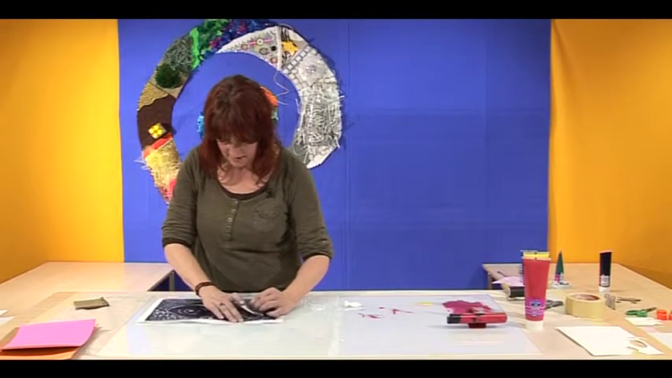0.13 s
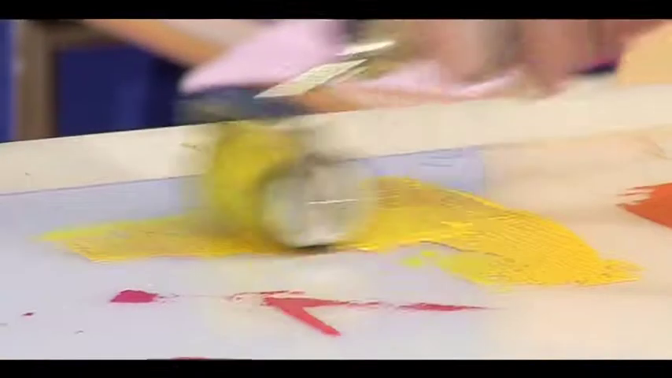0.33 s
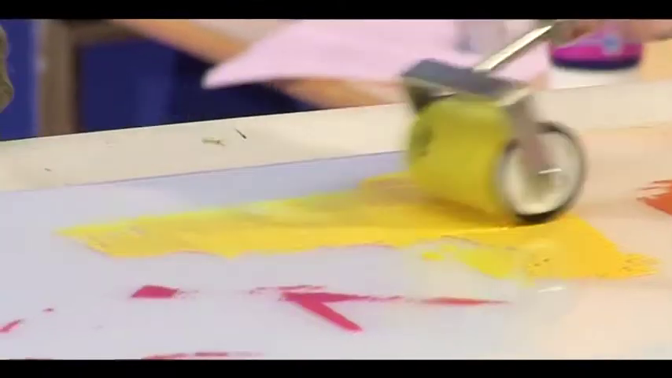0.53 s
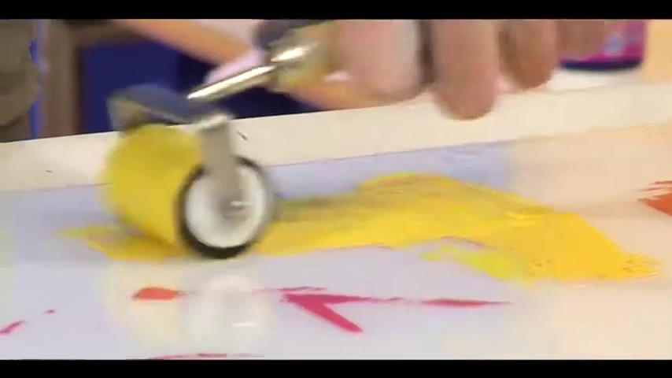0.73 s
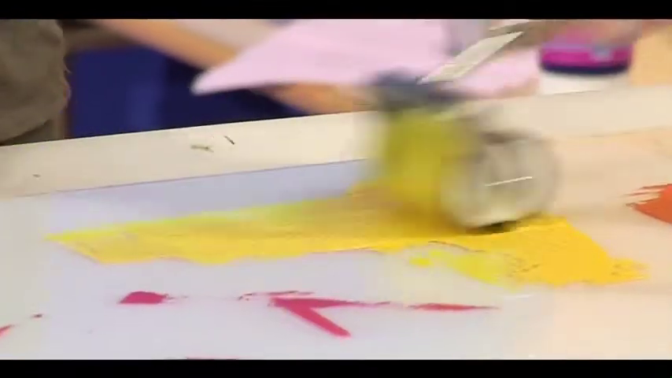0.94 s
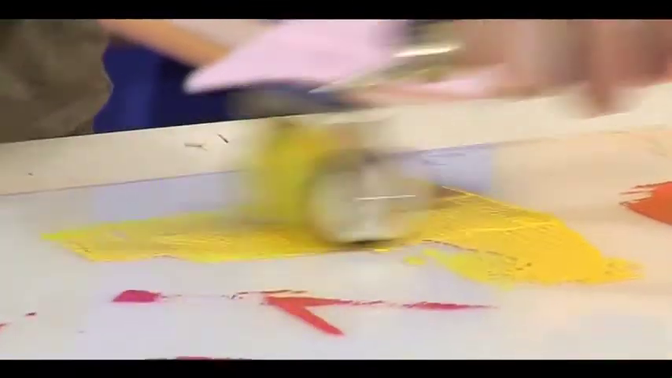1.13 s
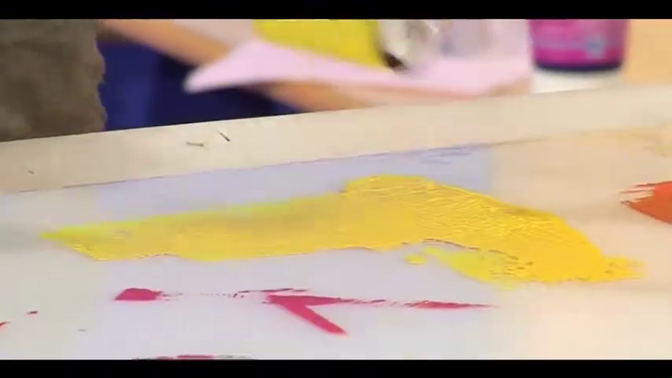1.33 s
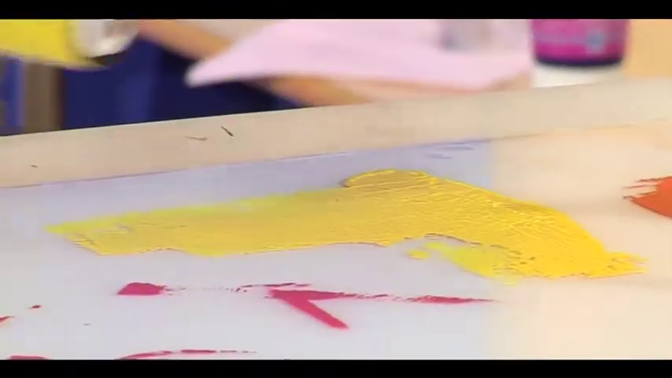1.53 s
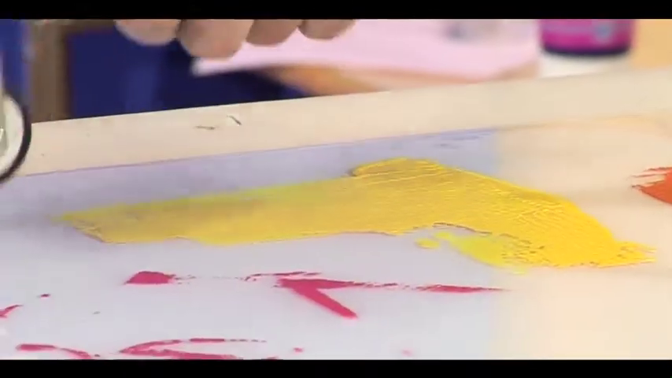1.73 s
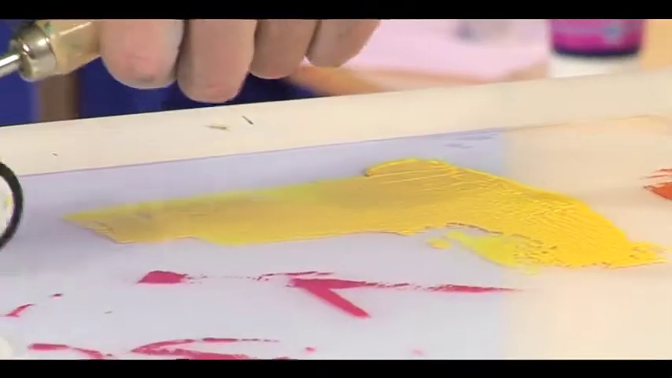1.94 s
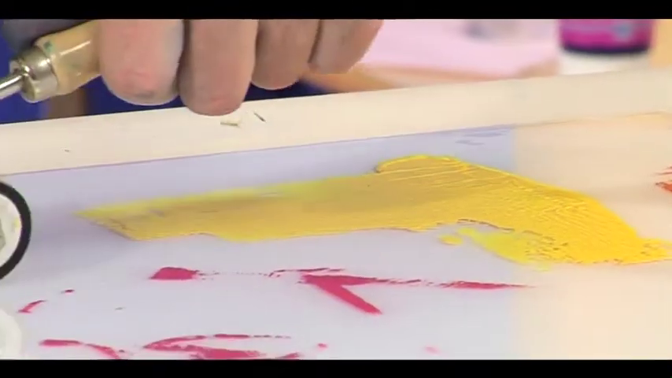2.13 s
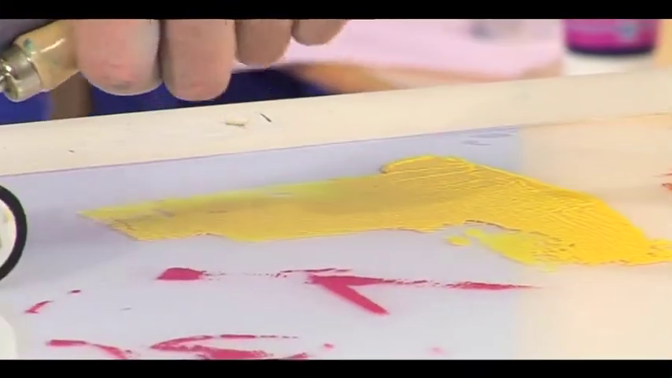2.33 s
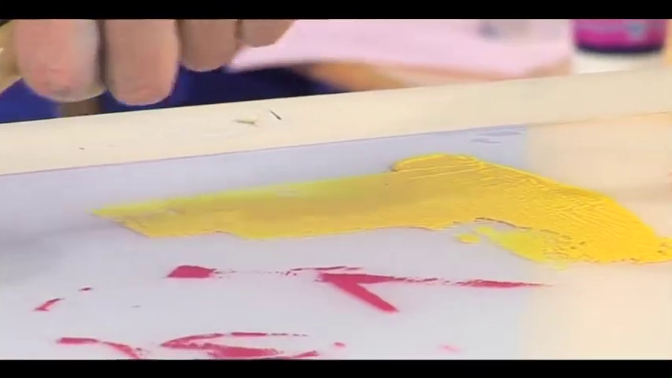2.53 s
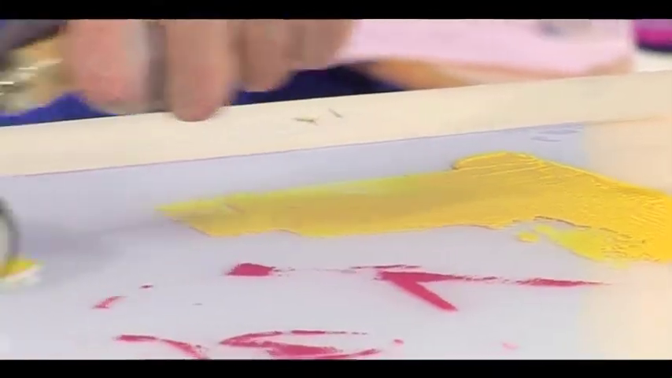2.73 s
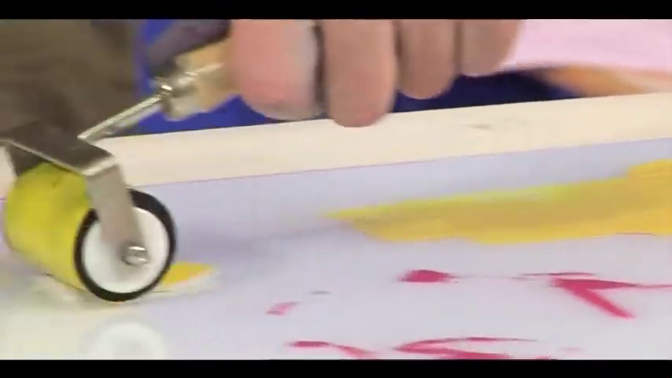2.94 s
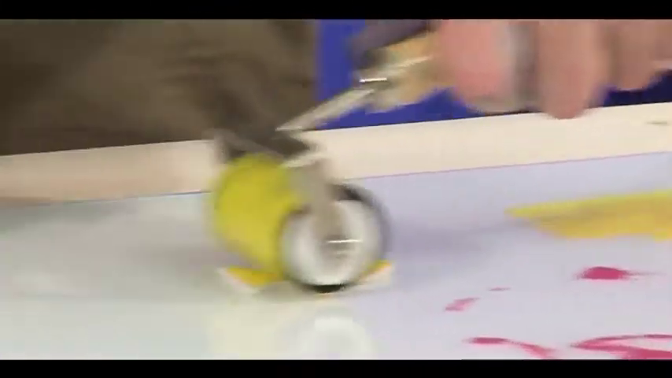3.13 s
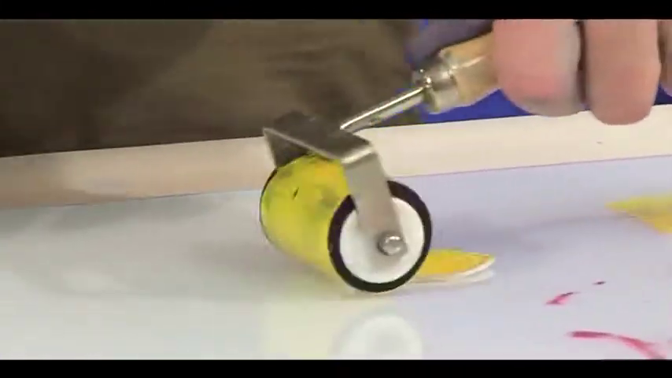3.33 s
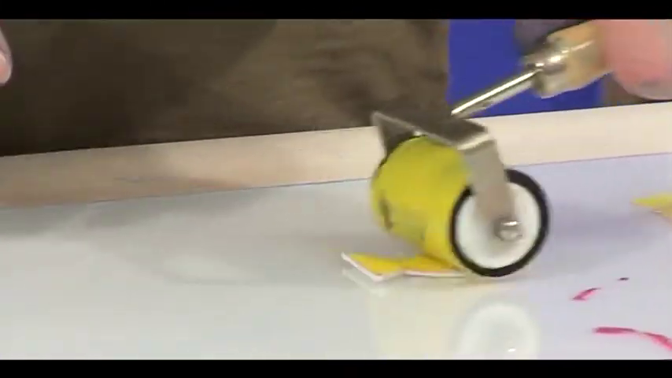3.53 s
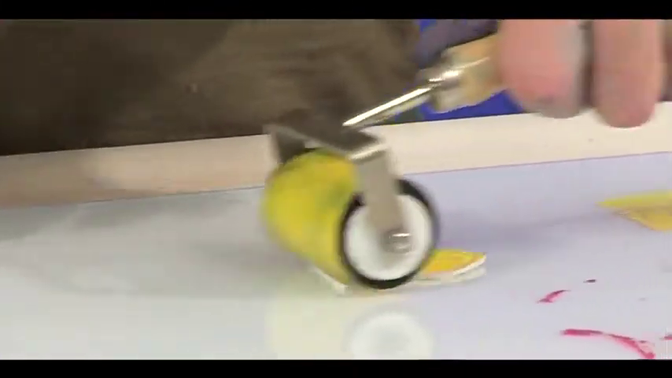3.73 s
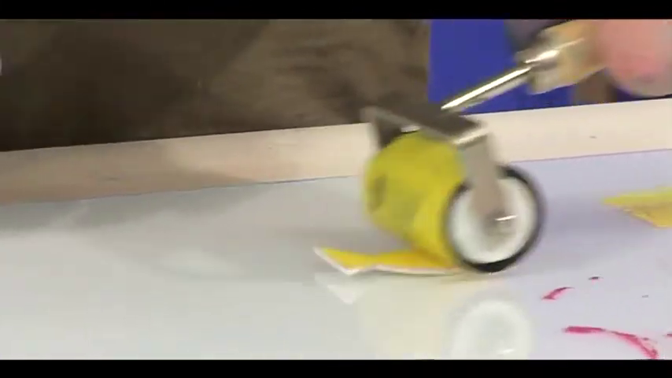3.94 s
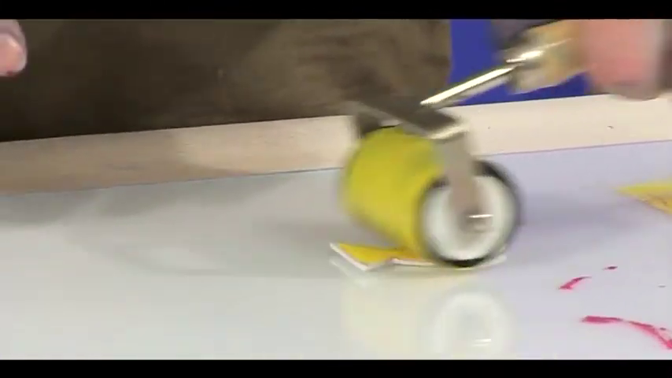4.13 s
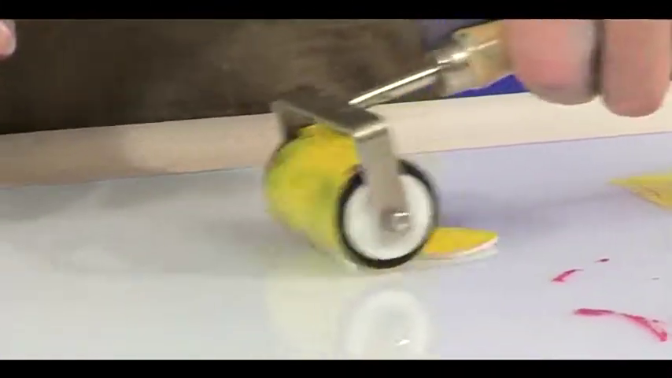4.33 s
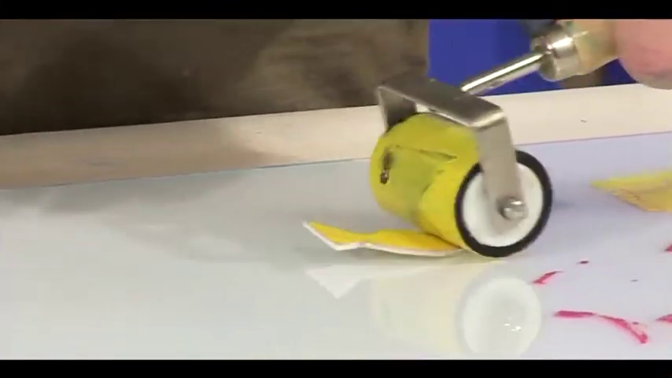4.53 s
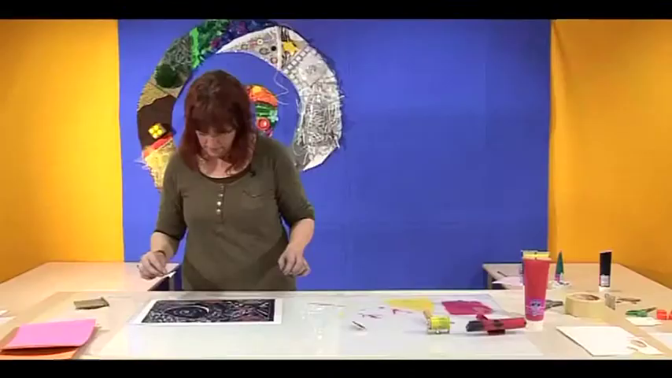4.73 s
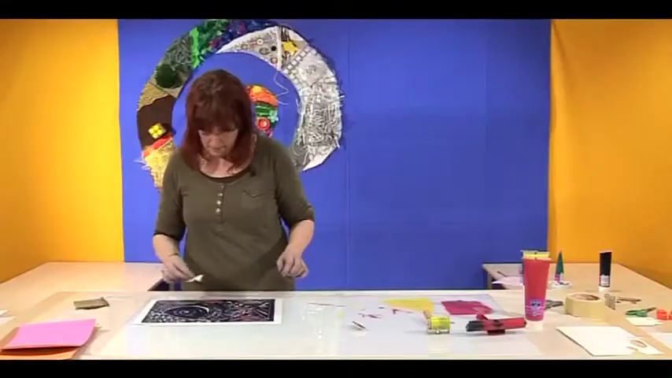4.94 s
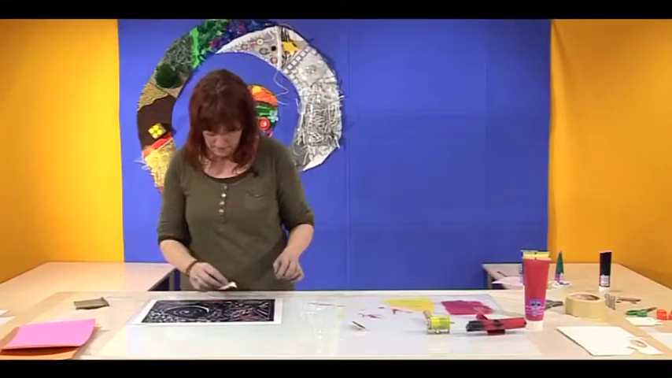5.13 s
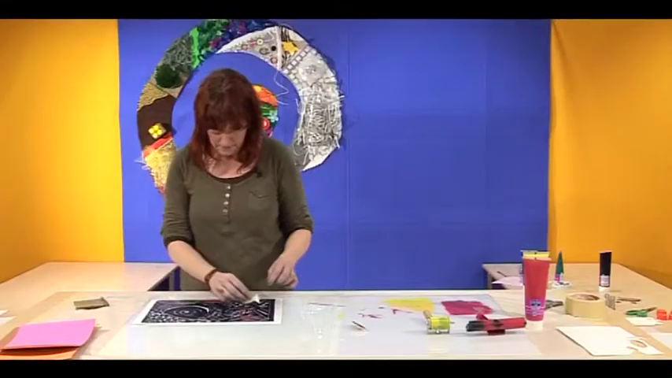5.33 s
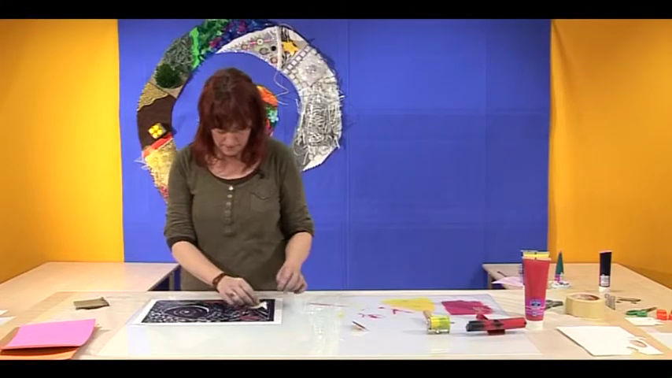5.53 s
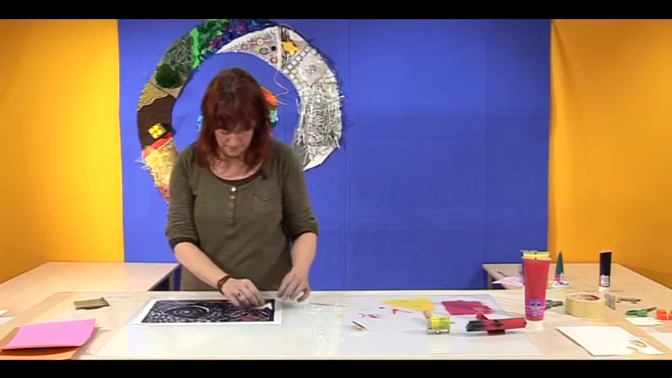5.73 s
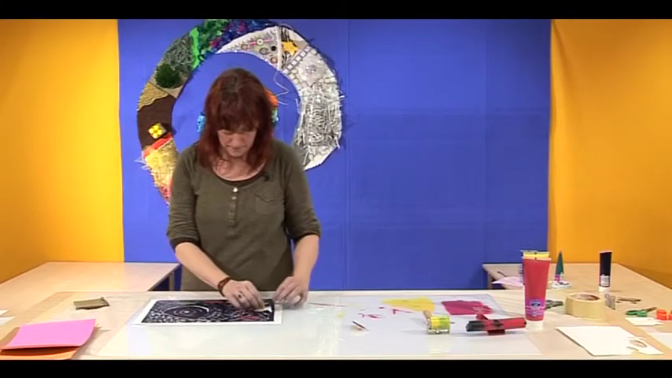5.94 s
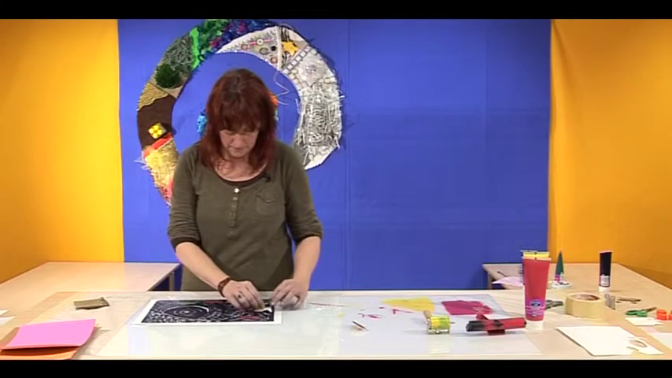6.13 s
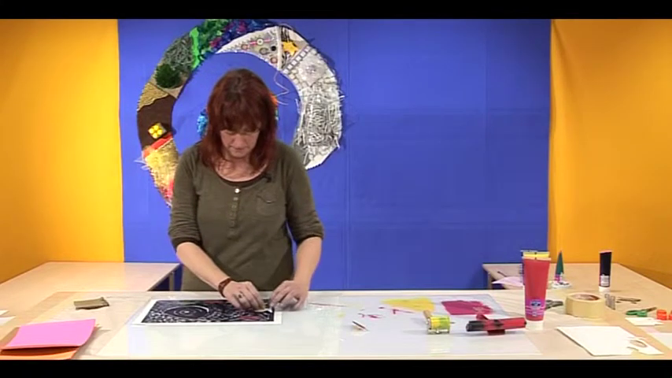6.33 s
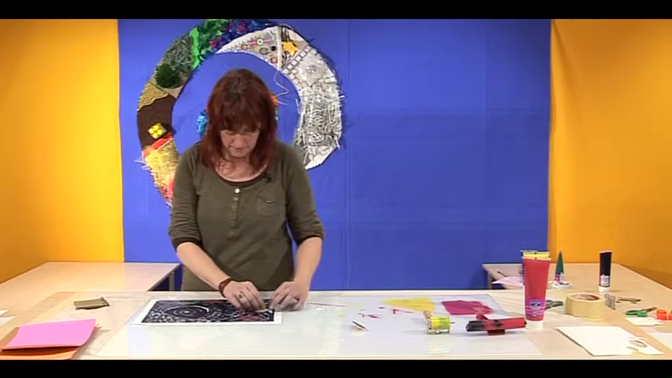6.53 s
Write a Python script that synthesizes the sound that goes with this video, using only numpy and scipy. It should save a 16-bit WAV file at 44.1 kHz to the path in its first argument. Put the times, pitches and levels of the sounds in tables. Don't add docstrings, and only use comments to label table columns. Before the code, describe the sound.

Dry taps, a sticky rubber roller rumbling with sharp ink pops, rustling hands, five bursts of tiny squeaks, then near silence with faint ticks.

```python
import sys
import numpy as np
from scipy import signal
from scipy.fft import rfft, irfft, next_fast_len
from scipy.io import wavfile
from scipy.ndimage import uniform_filter1d

SR = 44100
rng = np.random.default_rng(int(sys.argv[2]) if len(sys.argv) > 2 else 0)


def dump(signal):
    limited = np.clip(np.atleast_2d(signal).T, -1, 1)
    pcm = np.round(limited * 32767).astype(np.int16)
    wavfile.write(sys.argv[1], SR, pcm)


def volts_from_decibels(level):
    exponent = np.asarray(level, float) / 20
    return 10 ** exponent


N = 294335
T = np.arange(N) / SR
STROKE_S, REPEAT_S, LAST_CUT_S = 0.338, 0.48, 4.817


def unit(x):
    return x / np.sqrt(np.mean(x ** 2))


def colour(x, points):
    hz, db = np.transpose(points)
    size = next_fast_len(len(x))
    f = np.arange(size // 2 + 1) * SR / size + 1
    gain = volts_from_decibels(np.interp(np.log(f), np.log(hz), db))
    return irfft(rfft(x, size) * gain, size)[:len(x)]


def ring(x, hz, width_hz):
    return signal.lfilter(*signal.iirpeak(hz, hz / width_hz, fs=SR), x)


def grains(per_s, spread_db, smooth):
    size_db = spread_db * np.minimum(rng.exponential(size=N), 4)
    snaps = (rng.random(N) < per_s / SR) * volts_from_decibels(size_db) * rng.standard_normal(N)
    return unit(snaps) + smooth * rng.standard_normal(N)


def bump(s, length_s):
    return np.exp(-(2 * (T - s) / length_s) ** 2)


def swells(table, rest_db, column=2):
    return volts_from_decibels(rest_db) + sum(volts_from_decibels(row[column]) * bump(row[0], row[1]) for row in table)


def add(out, s, burst, db):
    i = int(s * SR)
    out[i:i + len(burst)] += (burst * volts_from_decibels(db) / np.abs(burst).max())[:N - i]


def blow(t60, tail_db):
    t = T[:4096]
    x = volts_from_decibels(tail_db) * rng.standard_normal(len(t)) * 1000 ** (-t / max(t60, 0.002))
    x[0] += 1
    return x


def touches(table, tail_db):
    out = np.zeros(N)
    for s, db, hz, width, t60 in table:
        spread = 1 + max(width, 30) / hz / 2
        body = signal.butter(2, [hz / spread, hz * spread], "band", fs=SR, output="sos")
        add(out, s, signal.sosfilt(body, blow(t60, tail_db)), db)
    return out


def room(x):
    t60_s, treble_t60_s, gap_s, level_db = 1.1, 0.55, 0.008, -16
    t = T[:SR]
    low = signal.lfilter(*signal.butter(2, 2800, fs=SR), rng.standard_normal(SR))
    tail = 1.3 * low * 1000 ** (-t / t60_s)
    tail += rng.standard_normal(SR) * 1000 ** (-t / treble_t60_s)
    tail *= 1 - np.exp(-t / gap_s)
    return x + volts_from_decibels(level_db) * signal.fftconvolve(x, tail / np.sqrt(np.sum(tail ** 2)))[:N]


# frequency in Hz, level in dB per Hz.
STUDIO_SPECTRUM = [(15, -27), (25, -22.5), (53, -0.5), (83, -13), (128, -10), (146, -16.5), (266, -15.5),
                   (296, -13.5), (389, -20), (1150, -25), (2040, -38), (15200, -47.5), (16500, -63)]


def studio():
    return volts_from_decibels(-62) * unit(colour(rng.standard_normal(N), STUDIO_SPECTRUM))


# middle in seconds, length in seconds, dull shuffle in dB, paper in dB.
HAND_MOVES = [(.02, 0.059, -81, -78.5), (0.23, 0.21, -70, -78), (0.33, 0.045, -65, -74),
              (1.52, 0.28, -60, -78), (1.8, 0.31, -69, -81), (2.06, 0.23, -59, -77),
              (2.42, 0.073, -56, -86), (2.72, 0.46, -62, -80.5), (2.9, 0.095, -60, -79),
              (3.06, 0.2, -63, -82), (3.45, 0.13, -62, -79), (3.64, 0.13, -66, -75),
              (3.85, 0.2, -61.5, -78.5), (4.15, 0.45, -76, -83), (4.29, 0.15, -59.5, -74),
              (4.51, .1, -66.5, -72), (4.86, 0.064, -76, -77), (5.2, 0.074, -74, -91),
              (5.35, 0.12, -84, -76.5), (5.47, .08, -75, -86), (5.87, 0.13, -80, -81),
              (6.1, 0.089, -71, -88.5), (6.6, 0.097, -69, -84)]
# middle in seconds, length in seconds, level in dB.
LEANING = [(1.03, 0.077, -38.5), (1.2, 0.19, -49.5), (1.4, 0.046, -44), (1.65, 0.28, -49.5),
           (1.9, 0.17, -56), (2.48, 0.21, -58.5), (2.87, 0.043, -48.5), (3.05, 0.18, -60),
           (3.5, 0.22, -63.5), (4.2, 0.052, -71), (4.68, 0.13, -65), (5.05, .15, -71), (5.34, 0.075, -65),
           (5.58, 0.13, -63), (6.36, 0.12, -60)]
# frequency in Hz, level in dB per Hz.
SWAY_SPECTRUM = [(8.8, -17.5), (15, -1), (29, -8), (90, -19), (120, -32), (200, -120)]
# frequency in Hz, level in dB per Hz.
SHUFFLE_SPECTRUM = [(41, -31), (70, 5.5), (172, -2.5), (208, -8.5), (272, -5), (808, -13.5), (1800, -58),
                    (2340, -30.5), (3960, -120)]
# frequency in Hz, level in dB per Hz.
RUSTLE_SPECTRUM = [(900, -11), (1500, 3.5), (2800, -4), (5000, -6), (8000, -11.5), (11000, -63)]
# frequency in Hz, level in dB per Hz.
PEEL_SPECTRUM = [(5000, -10.5), (8000, 2), (12000, 4), (16000, 1), (17000, -8)]
# frequency in Hz, width in Hz.
LOWEST_MODE = (178, 22)


def hands():
    rest_paper_db = -82.5
    sway, shuffle = swells(LEANING, -66.5), swells(HAND_MOVES, -72)
    rustle = swells(HAND_MOVES, rest_paper_db, column=3)
    peel = volts_from_decibels(-80) + volts_from_decibels(-9.5) * (rustle - volts_from_decibels(rest_paper_db))
    thud = colour(grains(600, 2.2, 1.5), SHUFFLE_SPECTRUM)
    off_ink = 1 - ((T > STROKE_S) & (T < 1.45))
    return (sway * unit(colour(rng.standard_normal(N), SWAY_SPECTRUM))
            + off_ink * shuffle * unit(thud + 1.9 * ring(thud, *LOWEST_MODE))
            + off_ink * volts_from_decibels(3.0) * rustle * unit(colour(grains(2500, 0.4, 0.83), RUSTLE_SPECTRUM))
            + off_ink * peel * unit(colour(grains(1800, 1.6, 1.5), PEEL_SPECTRUM)))


# start in seconds, peak in dB, ring t60 in seconds.
SHEET_TAPS = [
    (0.137, -53.5, 0.0046),
    (0.175, -35.5, 0.0071),
    (0.1876, -40, 0.0072),
    (0.2038, -42, 0.0048),
    (0.2184, -60, 0.0072),
    (0.2334, -40, 0.0097),
    (0.2999, -33.5, 0.016),
    (0.3234, -39, 0.019),
    (0.3307, -47, 0.015),
    (2.4218, -43, 0.0041),
]
# lower edge in Hz, upper edge in Hz.
SHEET_BAND = [1080, 3450]
# start in seconds, peak in dB, centre in Hz, width in Hz,
# ring t60 in seconds.
NAIL_EDGES = [
    (.11, -55, 7600, 9000, .006),
    (.186, -52, 7500, 9000, 0.0088),
    (.235, -53, 8000, 8000, .006),
    (.301, -38, 5450, 1800, 0.009),
    (.3075, -45, 4500, 5100, .006),
    (.332, -50, 5900, 1820, .007),
]


def taps():
    out = np.zeros(N)
    sheet = signal.cheby1(5, 1, SHEET_BAND, "band", fs=SR, output="sos")
    for s, db, t60 in SHEET_TAPS:
        soft_blow = uniform_filter1d(blow(t60, tail_db=-19), size=5, mode="constant")
        add(out, s, signal.sosfilt(sheet, soft_blow), db)
    return out + touches(NAIL_EDGES, tail_db=-11)


# time in seconds, rubber scrape in dB.
ROLL_SPEED = [
    (0.818, -53),
    (0.95, -55),
    (1.06, -62),
    (1.13, -53.5),
    (1.2, -66.5),
    (1.27, -59),
    (1.36, -59),
    (1.43, -71.5),
    (1.6, -87),
]
# middle in seconds, length in seconds, level in dB.
ROLLER_PRESSES = [
    (0.85, 0.099, -52),
    (1.0, 0.061, -49),
    (1.13, 0.15, -55),
    (1.274, 0.046, -44),
    (1.382, .05, -47.5),
]
# middle in seconds, length in seconds, level in dB.
INK_TEARS = [
    (0.95, 0.048, -56),
    (1.11, 0.036, -63),
    (1.15, 0.096, -66),
    (1.28, .06, -62.5),
    (1.34, .05, -66),
    (1.43, .14, -69),
]
# frequency in Hz, width in Hz, level in dB.
TABLE_MODES = [(223, 24, 3.5), (312, 47, 3), (390, 140, -2.5), (427, 23, 1.5), (545, 42, 1), (665, 17, -15),
               (693, 45, 0), (755, 58, -8.5), (860, 44, -2.5), (1029, 41, -5.5)]
# frequency in Hz, level in dB per Hz.
SCRAPE_SPECTRUM = [(650, -48), (1100, 1), (1850, -6), (2040, -3.5), (3510, -8.5), (4940, -7), (7000, -33),
                   (9100, -48), (15400, -120)]
# frequency in Hz, level in dB per Hz.
INK_SPECTRUM = [(2940, -40), (5000, -4), (6650, -3.5), (8790, -3), (9960, 1), (12300, -5), (14700, -1),
                (16500, -31)]


def stroke():
    s, db = np.transpose(ROLL_SPEED)
    speed_db = np.interp(T, s, db, left=-150, right=-150)
    scrape = volts_from_decibels(speed_db)
    upper = volts_from_decibels(db.max() + 7.5 + 0.72 * (speed_db - db.max()))
    low = swells(ROLLER_PRESSES, -150) + volts_from_decibels(-2.5) * scrape
    ink = swells(INK_TEARS, -150) + volts_from_decibels(-6) * scrape
    modes = sum(volts_from_decibels(db) * ring(rng.standard_normal(N), hz, w) for hz, w, db in TABLE_MODES)
    drone = ring(ring(rng.standard_normal(N), *LOWEST_MODE), *LOWEST_MODE)
    drone /= np.sqrt(np.abs(signal.hilbert(drone, next_fast_len(N)))[:N])
    return (low * unit(drone) + upper * unit(modes)
            + scrape * unit(colour(grains(3000, 2.4, 0.75), SCRAPE_SPECTRUM))
            + ink * unit(colour(grains(2200, 3.3, 0.95), INK_SPECTRUM)))


# time in seconds, peak in dB, ring t60 in seconds.
THREAD_POPS = [(0.9224, -38.5, 0.017), (0.9667, -38, 0.022), (0.9934, -37.5, 0.012), (1.0595, -48, 0.013),
               (1.092, -35, 0.042), (1.1063, -34, 0.039), (1.2276, -42.5, 0.012), (1.317, -32.5, 0.011),
               (1.323, -31, 0.0069), (1.332, -29, 0.0064), (1.339, -35, 0.0033), (1.3437, -46, 0.01),
               (1.349, -32, 0.009), (1.3553, -40, 0.018), (1.381, -25, 0.0057), (1.3894, -45, 0.012),
               (1.403, -43, 0.012)]
# time in seconds, peak in dB, ring t60 in seconds.
NEIGHBOUR_POP = (1.3185, -35, 0.008)
# time in seconds, peak in dB, ring t60 in seconds.
THICKEST_POP = (1.0873, -14.5, .007)
# frequency in Hz, level in dB per Hz.
POP_SPECTRUM = [(880, -67), (1500, -31), (2960, -9), (4430, -16), (6710, -6), (8730, -6.5), (12300, 0),
                (14800, -1), (16800, -42)]


def pops():
    out = np.zeros(N)
    for s, db, t60 in THREAD_POPS + [NEIGHBOUR_POP, THICKEST_POP]:
        snap = np.roll(blow(t60, tail_db=-9), int(0.0021 * SR))
        add(out, s - 0.002, colour(snap, POP_SPECTRUM), db)
    return out


# start in seconds, peak in dB, centre in Hz, width in Hz,
# ring t60 in seconds.
TABLE_KNOCKS = [(1.074, -38, 703, 151, 0.66), (1.08, -47.5, 990, 120, 0.29), (1.134, -37.5, 420, 164, 0.2),
                (1.249, -43, 183, 302, 0.38), (1.251, -43, 650, 500, 0.1), (2.062, -43, 127, 305, 0.22),
                (2.165, -46.5, 706, 350, 0.057), (2.179, -54, 640, 300, 0.065),
                (2.419, -45, 168, 300, 0.04), (2.847, -56, 107, 300, 0.13), (3.446, -52.5, 102, 300, 0.15),
                (5.846, -54.5, 298, 120, 0.37), (5.84, -61, 1750, 500, 0.14), (6.2, -58, 292, 80, 0.27)]


def knocks():
    return touches(TABLE_KNOCKS, tail_db=-20.5)


# start in seconds, peak in dB, centre in Hz, width in Hz,
# ring t60 in seconds.
FINGER_TICKS = [
    (2.2384, -43.5, 3350, 3500, 0.011),
    (2.2452, -51, 3800, 3500, 0.03),
    (3.077, -53, 3100, 3454, 0.02),
    (3.4265, -53, 3840, 3465, 0.016),
    (4.8694, -77, 3080, 3470, 0.014),
    (5.3147, -58, 5030, 3480, 0.028),
    (6.1736, -59.5, 4220, 3500, 0.013),
    (6.65, -59.5, 3000, 3480, 0.017),
]


def ticks():
    return touches(FINGER_TICKS, tail_db=19)


# start in seconds, peak in dB, centre in Hz, width in Hz,
# ring t60 in seconds.
HANDLE_RINGS = [
    (2.422, -57.5, 3030, 350, 0.21),
    (2.432, -55.5, 2190, 300, 0.13),
]


def handle():
    return touches(HANDLE_RINGS, tail_db=6)


# start in seconds, length in seconds, slip rate from in Hz, to in Hz, level in dB.
AXLE_SQUEAKS = [(2.838, 0.012, 1800, 1963, -44.5), (2.85, 0.014, 2000, 1876, -43.5),
                (2.89, 0.0093, 1894, 2000, -55), (2.938, .015, 2020, 2000, -47),
                (3.256, .006, 2000, 1895, -51), (3.29, 0.015, 2025, 1919, -40.5),
                (3.302, 0.022, 1990, 1962, -46.5), (3.583, 0.0057, 1805, 1750, -58),
                (3.619, 0.0084, 2105, 2144, -53.5), (3.637, 0.0098, 2100, 2200, -60),
                (3.682, .014, 2050, 1930, -41.5), (3.699, .008, 1994, 1924, -45),
                (4.049, 0.0069, 2217, 2180, -51), (4.059, 0.022, 1960, 1829, -38.5),
                (4.08, 0.021, 1829, 1863, -37.5), (4.103, 0.011, 1752, 1820, -50),
                (4.112, .014, 1930, 1990, -45), (4.546, 0.0096, 1915, 1910, -49.5),
                (4.576, 0.025, 1960, 2160, -59), (4.61, 0.0075, 2104, 2040, -56),
                (4.618, 0.015, 1890, 1863, -40), (4.658, 0.018, 1816, 1978, -44),
                (4.676, 0.012, 1970, 1990, -44.5), (4.689, .008, 2010, 1976, -48)]
# multiple of the slip rate, level in dB under the second,
# loss in dB per dB of gentler slip.
UPPER_PARTIALS = [(3, -4, 1.5), (4, -11, 1.7), (5, -24.5, 1), (6, -17.5, 5), (7, -17.5, 12), (8, -21, 12)]


def squeaks():
    grip_s, let_go_s = 0.008, 0.0066
    bite_db, hard_db = -46.5, -39
    s, length, from_hz, to_hz, _ = np.transpose(AXLE_SQUEAKS)
    ends = np.ravel([s + 0.001, s + length - 0.001], order="F")
    hz = uniform_filter1d(np.interp(T, ends, np.ravel([from_hz, to_hz], order="F")), size=190)
    grip = np.zeros(N)
    for start, lasts, *_, db in AXLE_SQUEAKS:
        rise = np.clip((T - start) / grip_s, 0, 1)
        fall = np.clip(1 + (start + lasts - T) / let_go_s, 0, 1)
        grip += volts_from_decibels(db) * rise * fall
    first = 20 * np.log10(uniform_filter1d(grip, size=88).clip(1e-7))
    second = first - 1.5 + 2 * np.minimum(first - bite_db, 0)
    wander = unit(uniform_filter1d(rng.standard_normal(N), size=130))
    phase = 2 * np.pi * np.cumsum(hz * (1 + 0.012 * wander)) / SR
    tone = volts_from_decibels(first) * np.sin(phase) + volts_from_decibels(second) * np.cos(2 * phase + 0.7)
    for k, db, loss in UPPER_PARTIALS:
        partial_db = second + db + loss * np.minimum(second - hard_db, 0)
        tone -= volts_from_decibels(partial_db) * np.sin(int(round(k)) * phase)
    tone *= 1 + 0.12 * bump(3.311, 0.014) * np.sin(phase / 2)
    uneven = uniform_filter1d(uniform_filter1d(rng.standard_normal(N), size=40), size=30)
    tone *= np.sqrt(2) * (1 + volts_from_decibels(-20) * unit(uneven))
    return tone + volts_from_decibels(16) * ring(tone, 13120, 45)


# middle in seconds, length in seconds, level in dB, top in Hz.
AXLE_CHATTER = [(2.847, 0.013, -58, 6260), (2.95, 0.01, -64, 6030), (3.255, 0.12, -69.5, 2740),
                (3.302, 0.011, -55.5, 6100), (3.588, 0.043, -68, 2725), (3.64, 0.039, -75, 2970),
                (3.688, 0.0091, -63, 7015), (4.006, 0.11, -67.5, 2800), (4.072, 0.023, -51.5, 7010),
                (4.107, 0.017, -47, 7590), (4.123, 0.016, -66, 5200), (4.516, 0.047, -69.5, 2980),
                (4.567, 0.061, -66, 3030), (4.643, 0.0097, -63, 4260), (4.68, 0.039, -78, 5070)]


def rasps():
    grit = grains(5200, 2.6, 1.0)
    out = np.zeros(N)
    for s, length, db, top_hz in AXLE_CHATTER:
        band = signal.butter(3, [1650, top_hz], "band", fs=SR, output="sos")
        out += volts_from_decibels(db) * bump(s, length) * unit(signal.sosfilt(band, grit))
    return out


# frequency in Hz, gain in dB.
TOP_EDGE = [(15750, 0), (15950, -40)]


def scene():
    out = colour(studio() + hands() + stroke(), TOP_EDGE)
    out += room(squeaks() + rasps()) * (T < LAST_CUT_S)
    out += room(pops() + taps() + ticks() + handle() + knocks())
    start, length = int(STROKE_S * SR), int(round(REPEAT_S * SR))
    out[start:start + length] = out[start + length:start + 2 * length]
    for cut in (STROKE_S, STROKE_S + REPEAT_S, LAST_CUT_S):
        out *= np.clip(np.maximum((cut - T) / 0.0058, (T - cut) / 0.0011), 0, 1)
    return out[None]


def band_limit(x):
    return signal.sosfilt(signal.butter(12, 17000, fs=SR, output="sos"), x)


def record(dry):
    return band_limit(dry)


dry = scene()
out = record(dry)
dump(out)
```